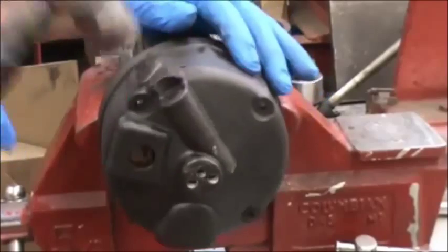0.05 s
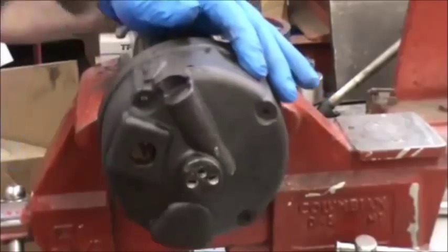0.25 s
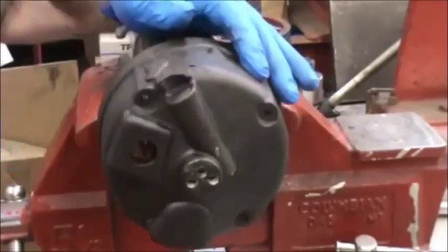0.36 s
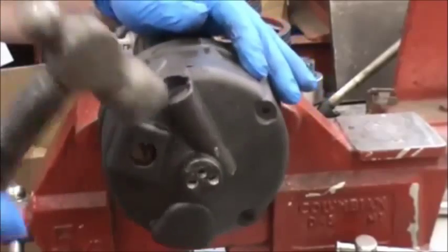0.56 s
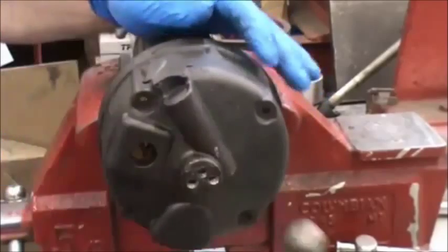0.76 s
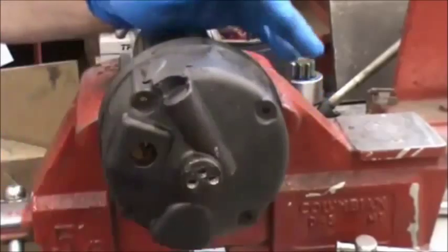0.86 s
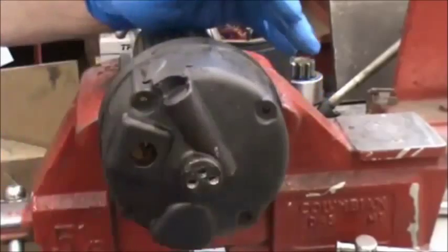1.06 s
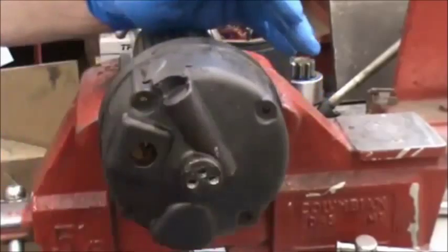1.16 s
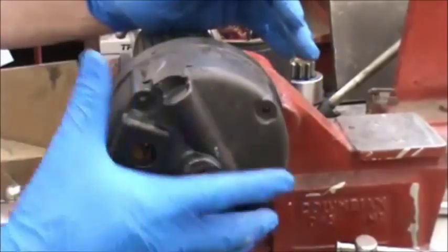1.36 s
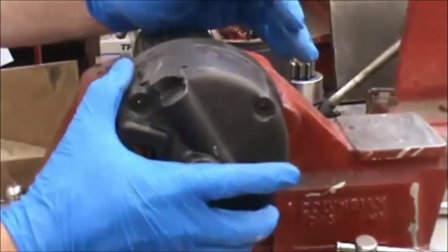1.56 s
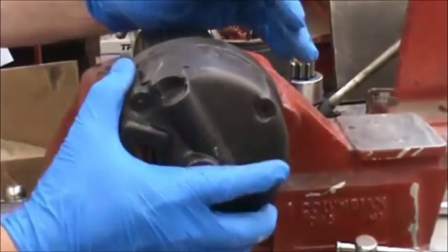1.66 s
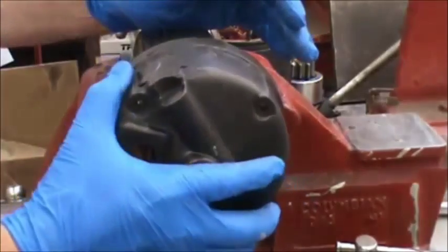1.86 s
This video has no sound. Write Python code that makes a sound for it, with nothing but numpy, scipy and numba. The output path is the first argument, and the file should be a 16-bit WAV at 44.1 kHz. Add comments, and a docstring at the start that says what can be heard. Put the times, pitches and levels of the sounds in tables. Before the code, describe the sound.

Two hard hammer taps on a cast metal housing, then the hammer clatters onto the bench

```python
"""Hammer taps and a drop on the bench

A hammer taps a cast metal housing, then is dropped: its head thuds and rings, the handle bangs down
twice and the tool rocks in small ticks and knocks while a glove rubs the housing. Blows are sums of
decaying modes and sharp pulses, each sent through a noise-built workshop tail. Sine hum and flickering
air noise lie beneath; a small camera's limiter holds the loud starts flat."""
import sys
import numpy as np
from scipy import signal
from scipy.fft import rfft, irfft
from scipy.io import wavfile
from scipy.ndimage import uniform_filter1d
from numba import njit

SR = 44100
rng = np.random.default_rng(int(sys.argv[2]) if len(sys.argv) > 2 else 0)


def output_pcm(signal):
    """Save a mono or channel-first signal as 16-bit PCM at the path in sys.argv[1].

    Samples are clipped to [-1, 1] before scaling.
    """
    pcm = np.clip(np.atleast_2d(signal).T, -1, 1) * 32767
    wavfile.write(sys.argv[1], SR, np.round(pcm).astype(np.int16))


N = 83790
PAD = int(.6 * SR)  # lead-in, samples: room for blows struck before time 0
BANDS_HZ = 32 * 2 ** np.arange(0, 9.1, .5)
# bench modes: mode_hz, level_db, decay_s (to -56 dB)
BENCH_MODES = [(174, -15.5, 0.039), (232, -4.5, 0.035), (282, -6, 0.02), (335, -0.5, 0.022),
               (406.5, 1.5, 0.033), (486, 5, 0.015), (570, -8.5, 0.037), (780, -10, 0.017),
               (874, -30, 0.018)]


def undb(db):
    """Decibels to amplitude ratio."""
    return 10 ** (np.asarray(db) / 20)


def at(table, hz):
    """Read a (Hz, value) table on a log frequency axis."""
    table_hz, value = np.array(table).T[:2]
    return np.interp(np.log(np.maximum(hz, 1)), np.log(table_hz), value)


def colour(x, gain):
    """Filter by a gain per frequency."""
    size = x.shape[-1]
    return irfft(rfft(x) * gain(np.fft.rfftfreq(size, 1 / SR)), size)


def unit(x):
    """Scale to a mean energy of 1 per channel."""
    energy = np.sum(x ** 2) / np.size(x) * x.shape[-1]
    return x / np.sqrt(energy)


def pair(size):
    """Two noise channels with a set coherence: shared mid plus opposed side."""
    # squared coherence of the channels: hz, coherence_squared (0-1)
    likeness = [(60, .85), (130, 1), (290, 0.3), (640, .7), (1410, 0.9), (3100, 0.78), (6820, 1),
                (15000, 0.52)]

    def share(sign):
        return lambda hz: np.sqrt((1 + sign * np.clip(at(likeness, hz), 0, 1) ** .5) / 2)

    mid, side = rng.standard_normal((2, size))
    mid, side = colour(mid, share(1)), colour(side, share(-1))
    return np.array([mid + side, mid - side])


def band(centre_hz):
    """Bell one octave wide at its feet; half-octave neighbours sum to one."""
    def gain(hz):
        octaves = np.log2(np.maximum(hz, 1) / centre_hz)
        return np.cos(np.pi * np.clip(octaves, -.5, .5)) ** 2
    return gain


def walk(rate_hz):
    """Random steps smoothed twice; standard deviation about 1.4."""
    k = int(SR / rate_hz)
    steps = np.repeat(rng.standard_normal(N // k + 1), k)
    return 1.87 * uniform_filter1d(uniform_filter1d(steps, k), k)[:N]


def ring(modes):
    """Struck modes as decaying sines; neighbours start in opposite polarity."""
    t = np.arange(SR // 2) / SR
    out = np.zeros(len(t))
    for k, (hz, db, decay_s) in enumerate(modes):
        decay = 0.0016 ** (t / max(decay_s, .003))
        out += (-1) ** k * undb(db) * np.sin(2 * np.pi * hz * t) * decay
    return out


def crack(spectrum):
    """Sharp edge of a blow: minimum-phase pulse of this colour, energy 1."""
    log_gain = at(spectrum, np.fft.rfftfreq(4096, 1 / SR)) * np.log(10) / 20
    cepstrum = irfft(log_gain)
    cepstrum[1:2048] *= 2  # fold to the causal side
    cepstrum[2049:] = 0
    return np.pad(unit(irfft(np.exp(rfft(cepstrum)))), (0, SR // 2 - 4096))


def place(x, when_s, direct_db, rough_contact=False):
    """Direct blow, roughened by a short noise burst on request, plus a fresh room tail of energy 1."""
    # room decay: hz, t60_s
    room = [(125, 0.54), (300, 0.61), (700, 0.43), (1500, 0.47), (3000, 0.5), (6000, 0.49), (10000, 0.44),
            (15000, 0.11)]
    rise_s, contact_s, low_cut_hz = .0025, .002, 139  # first two are time constants
    t, noise = np.arange(SR) / SR, pair(size=SR)
    tail = np.zeros((2, SR))
    for hz in BANDS_HZ:
        decaying = colour(noise, band(hz)) * 1e-3 ** (t / at(room, hz))
        tail += unit(decaying) * np.sqrt(hz)  # equal energy per Hz
    tail = unit(tail * (1 - np.exp(-t / rise_s)))
    if rough_contact:
        direct = unit(rng.standard_normal(SR) * np.exp(-t / contact_s))
    else:
        direct = t == 0
    response = tail + undb(direct_db) * direct
    x = signal.sosfilt(signal.butter(3, low_cut_hz, "high", fs=SR, output="sos"), x)
    wet = signal.fftconvolve(x[None], response)
    out = np.zeros((2, PAD + N + 2 * SR))
    start = PAD + int(when_s * SR)
    out[:, start:start + wet.shape[1]] = wet
    return out[:, PAD:PAD + N]


def workshop():
    """Machine hum of wavering sines over air noise whose bands flicker in level."""
    # hum lines: line_hz, level_db_rms
    hum_lines = [(129.5, -51.5), (240, -59.5), (360.5, -61.5), (480, -75), (600, -69.5), (721, -71)]
    # air noise spectrum: hz, density_db (relative)
    air_colour = [(25, -10), (45, -1.5), (80, 0), (130, 2.5), (200, -15), (420, -13.5), (1000, -18),
                  (2800, -18), (5000, -23), (9000, -28.5), (13600, -33), (16000, -34)]
    air_db_rms = -52
    t = np.arange(N) / SR
    noise = colour(pair(size=N), lambda hz: undb(at(air_colour, hz)))
    air = np.zeros((2, N))
    for hz in BANDS_HZ:
        air += colour(noise, band(hz)) * undb(1.2 * walk(9.76))  # spread about 1.7 dB
    hum = np.zeros(N)
    for hz, db in hum_lines:
        level = undb(db + 1.2 * walk(6)) * np.sqrt(2)  # spread about 1.7 dB
        hum += level * np.sin(2 * np.pi * (hz * t + rng.random()))
    return air / np.std(air) * undb(air_db_rms) + hum


def taps():
    """Each tap excites the housing modes; the place struck sets their mix."""
    # taps, the first heard only dying away: start_s, level_db, rim_place (0-1)
    tap_list = [(-.34, -9.5, 0.54), (0.2347, 6, 0.24), (0.5567, 6, 0.95)]
    # housing mode frequencies: mode_hz
    housing_hz = [190, 480, 1305, 1760, 2000, 2855, 3200, 3880, 4960, 4955, 5780, 6230, 7530, 9520, 10530,
                  11660, 12170, 12690, 14110]
    # housing modes: level_at_place_0_db, level_at_place_1_db, decay_s (to -56 dB)
    housing_modes = [(-25, -24, 0.082), (-17, -16, 0.043), (-21, -13, 0.16), (-30, -35, 0.026),
                     (-4.5, -8, 0.01), (-12.5, -8, 0.19), (-22, -3, 0.0083), (-6, -4.5, 0.038),
                     (5, 8.5, 0.019), (-15, -16.5, 0.35), (-25, -13.5, 0.045), (-48, -4, 0.012),
                     (-13, -3, 0.016), (-52, -9, 0.01), (-32, -1, 0.032), (-46, -6, 0.013),
                     (-37, -38, 0.036), (-40.5, -13, 0.035), (-46, -26.5, 0.057)]
    # tap edge spectrum: hz, density_db (relative)
    crack_colour = [(120, -38.5), (190, -4), (500, -13), (1000, -24), (2200, -2), (4400, -7), (7000, -21),
                    (9000, -26.5), (13000, -47), (15500, -68)]
    crack_db, direct_db = 14.5, -20
    edge = undb(crack_db) * crack(crack_colour)
    out = np.zeros((2, N))
    for start_s, level_db, spot in tap_list:
        modes = [(hz, db_0 + spot * (db_1 - db_0), decay_s)
                 for hz, (db_0, db_1, decay_s) in zip(housing_hz, housing_modes)]
        out += undb(level_db) * place(ring(modes) + edge, start_s, direct_db)
    return out


def head():
    """The head excites the bench modes, then a sharp edge and its own clear modes follow."""
    # head mode frequencies: mode_hz
    head_hz = [2531, 3576, 4671, 4781, 5539, 5674, 5745, 7289, 9292, 14420]
    # head modes: level_db, decay_s (to -56 dB)
    head_modes = [(-3.5, 0.11), (1, 0.15), (-6.5, 0.13), (-13.5, 0.28), (-7, 0.089), (-10.5, 0.4),
                  (-6.5, .15), (-11.5, 0.21), (-26, 0.13), (-38.5, 0.21)]
    # head edge spectrum: hz, density_db (relative)
    crack_colour = [(100, -31), (330, 6.5), (700, -13), (1300, -12.5), (3500, -16), (6000, -23),
                    (10000, -22), (14500, -29), (15500, -45)]
    start_s, ring_late_s = 1.0928, 0.002216
    thud_db, crack_db, ring_db = -8.5, 13.5, -26.5
    thud_direct_db, edge_direct_db, ring_direct_db = 9, 3, 17
    late_s = start_s + ring_late_s
    modes = [(hz, db, decay_s) for hz, (db, decay_s) in zip(head_hz, head_modes)]
    thud = place(undb(thud_db) * ring(BENCH_MODES), start_s, thud_direct_db)
    edge = place(undb(crack_db) * crack(crack_colour), late_s, edge_direct_db)
    return thud + edge + place(undb(ring_db) * ring(modes), late_s, ring_direct_db)


def rocking_ticks():
    """Small rocking contacts: a pulse and its weaker repeat, roughened by a short noise burst."""
    # ticks: start_s, level_db
    tick_list = [(1.166, -3), (1.5596, -10), (1.592, -20), (1.6228, -16), (1.6531, -13.5), (1.6805, -22.5),
                 (1.7077, -18.5), (1.7341, -20)]
    # tick spectrum: hz, density_db (relative)
    tick_colour = [(250, -17), (600, 3.5), (2500, -4), (6000, -12), (10000, -16.5), (13000, -26),
                   (16000, -39)]
    echo_s, echo_db, direct_db = 0.0065, -10, 3.5
    pulse = crack(tick_colour)
    tick = pulse + undb(echo_db) * np.roll(pulse, int(echo_s * SR))
    return sum(undb(db) * place(tick, s, direct_db, rough_contact=True) for s, db in tick_list)


def handle():
    """The handle bangs down and bounces: bench modes and an edge, roughened by a short noise burst."""
    # handle blows: start_s, level_db
    blows = [(1.2596, 2), (1.2696, -5.5)]
    # handle edge spectrum: hz, density_db (relative)
    crack_colour = [(59, -67), (100, -43), (174, -8), (461, -7.5), (583, 2.5), (891, -1), (8460, -19),
                    (13500, -19), (15000, -24), (16000, -82)]
    crack_db, bench_db, direct_db = 21.5, -3, -1.5
    blow = undb(bench_db) * ring(BENCH_MODES) + undb(crack_db) * crack(crack_colour)
    return sum(undb(db) * place(blow, s, direct_db, rough_contact=True) for s, db in blows)


def glove():
    """Glove rubbing on the housing: coloured noise under a grainy level curve."""
    # rub level curve: time_s, level_db_rms
    rub_levels = [(1.45, -35), (1.55, -44.5), (1.661, -45), (1.751, -43.5), (1.802, -61.5)]
    # rub spectrum: hz, density_db (relative)
    rub_colour = [(120, -35), (200, -3), (1430, -8), (2170, -11), (9550, -30), (15000, -39)]
    noise = colour(pair(size=N), lambda hz: undb(at(rub_colour, hz)))
    time_s, level_db = np.array(rub_levels).T
    db = np.interp(np.arange(N) / SR, time_s, level_db, left=-99, right=-99)
    db += 2 * walk(200)  # grain, spread about 2.8 dB
    return noise / np.std(noise) * undb(db)


def rocking_knocks():
    """Soft knocks of the rocking tool: dull pulses."""
    # knocks: start_s, level_db
    knock_list = [(1.5211, -13), (1.774, -13)]
    # knock spectrum: hz, density_db (relative)
    knock_colour = [(250, -20.5), (600, 7.5), (1100, 2.5), (1600, -13), (4000, -39)]
    knock = crack(knock_colour)
    return sum(undb(db) * place(knock, s, direct_db=2.5) for s, db in knock_list)


def scene():
    """Sum of all sources."""
    return (workshop() + taps() + head() + rocking_ticks() + handle()
            + glove() + rocking_knocks())


@njit
def follow(x, up, down):
    """One-pole envelope: quick up, slower down."""
    e, out = 0., np.empty(len(x))
    for i in range(len(x)):
        e += (x[i] - e) * (up if x[i] > e else down)
        out[i] = e
    return out


def record(dry):
    """Two close microphone ports, a linked limiter, soft peaks and a steep low-pass."""
    # left port's phase lead over the right: hz, lead_rad
    port_lead = [(100, 1), (430, -0.54), (1200, -0.77), (2500, -0.4), (5000, -0.53), (12000, 0.1)]
    # left minus right level: hz, difference_db
    port_tilt = [(60, 1.5), (200, 1), (1000, 0), (4000, -.3), (12000, -.5)]
    limit_db, ratio, attack_s, release_s = -8, 12, 0.00096, 0.01
    peak, top_hz = 0.6, 15300

    def port(x, sign):
        return colour(x, lambda hz: undb(sign * at(port_tilt, hz)) * np.exp(1j * sign * at(port_lead, hz)))

    ports = np.array([port(dry[0], .5), port(dry[1], -.5)])  # half the difference each
    env = follow(np.abs(ports).max(axis=0), min(1 / (attack_s * SR), 1.), 1 / (release_s * SR))
    held = ports * np.minimum(undb(limit_db) / (env + 1e-9), 1) ** (1 - 1 / ratio)
    soft = peak * np.tanh(held / peak)
    return signal.sosfilt(signal.ellip(8, .2, 70, top_hz, fs=SR, output="sos"), soft)


dry = scene()
out = record(dry)
output_pcm(out)
```